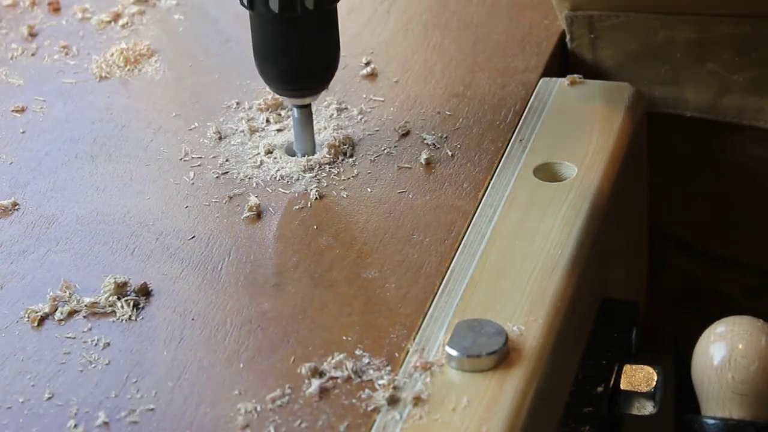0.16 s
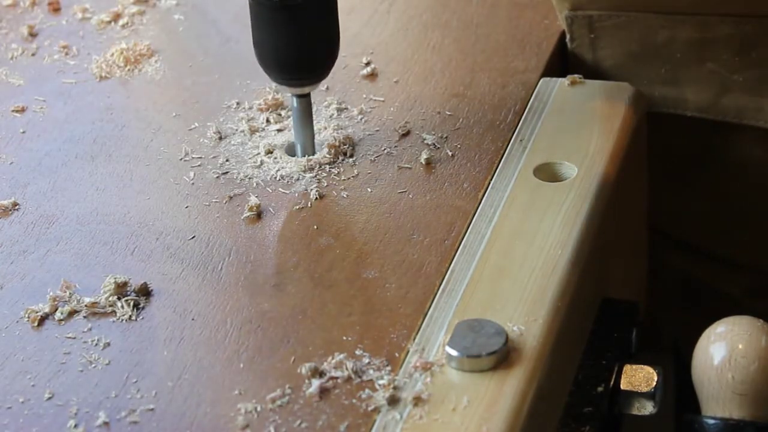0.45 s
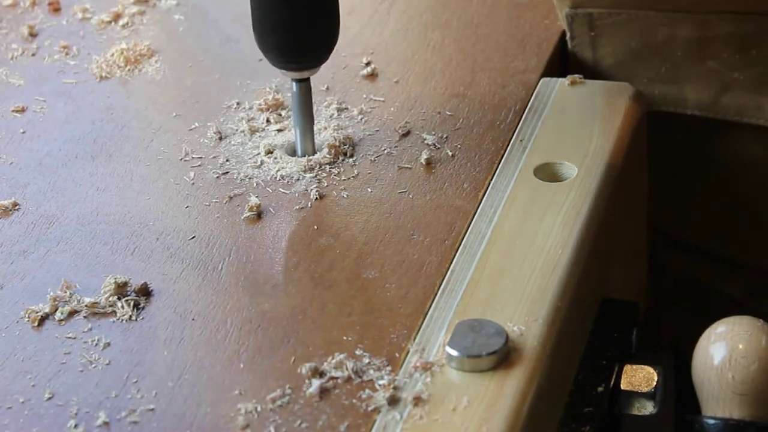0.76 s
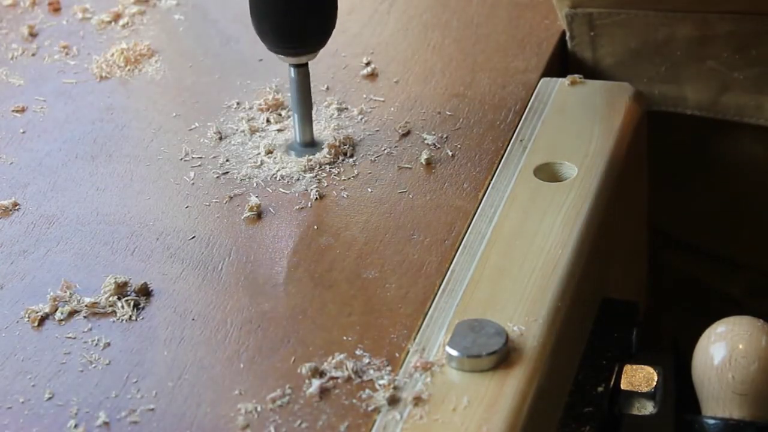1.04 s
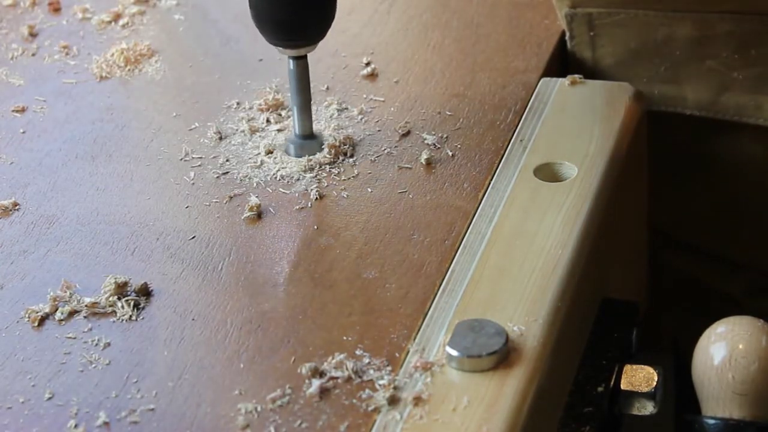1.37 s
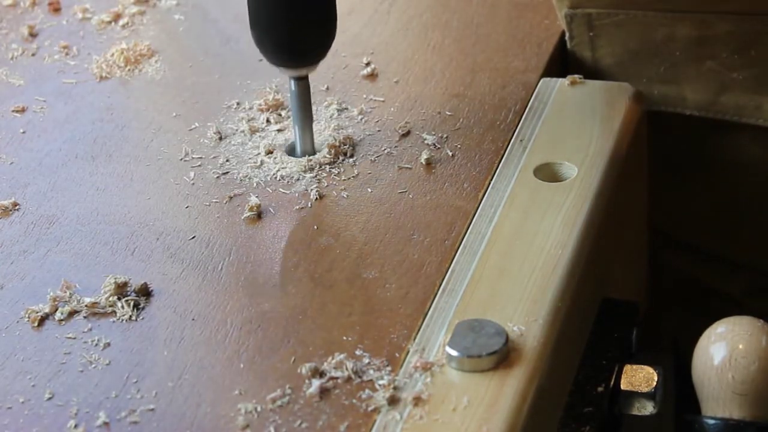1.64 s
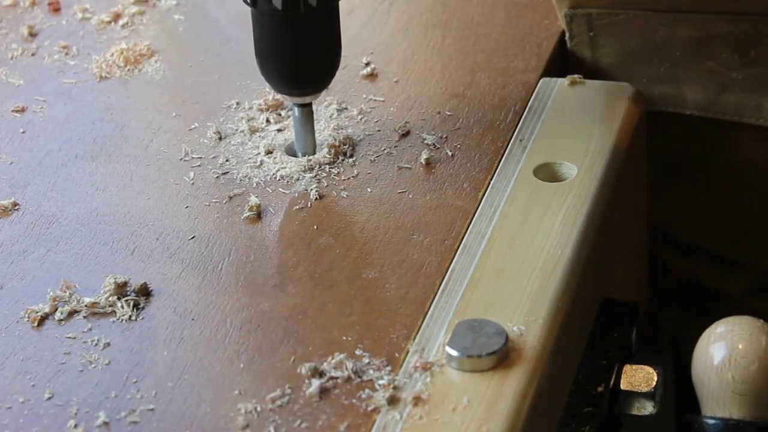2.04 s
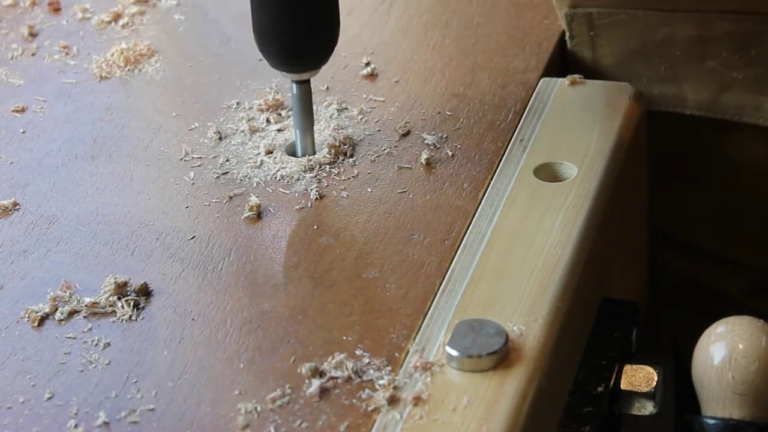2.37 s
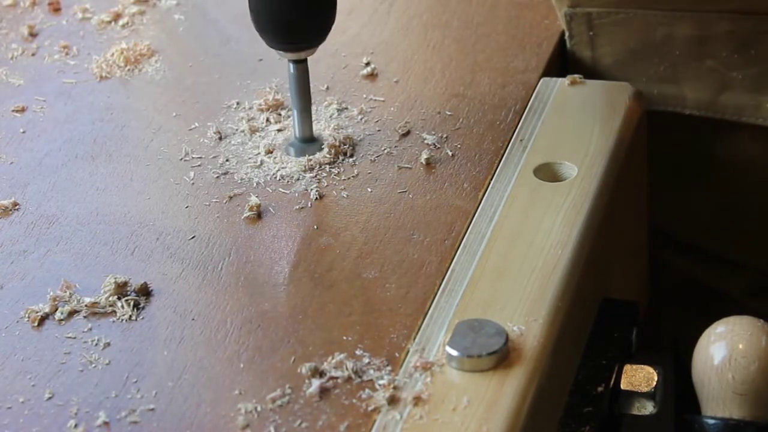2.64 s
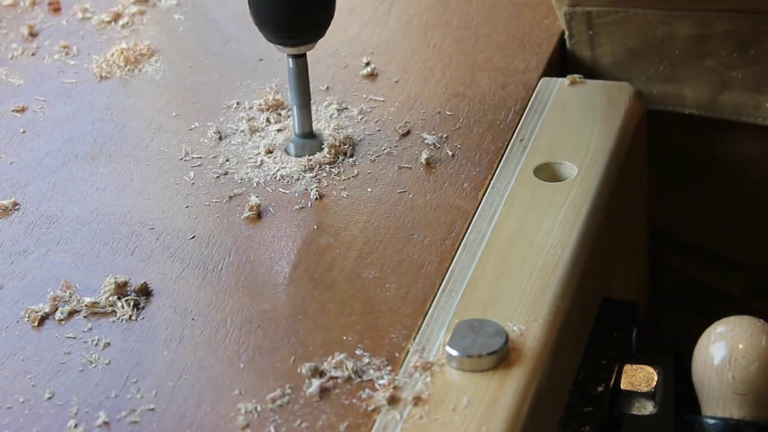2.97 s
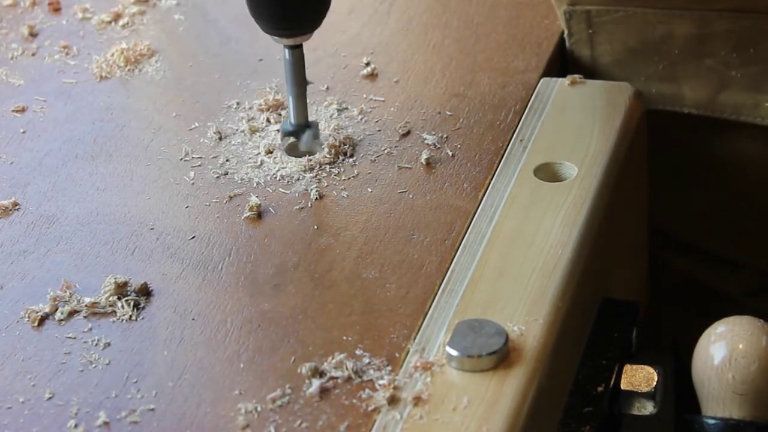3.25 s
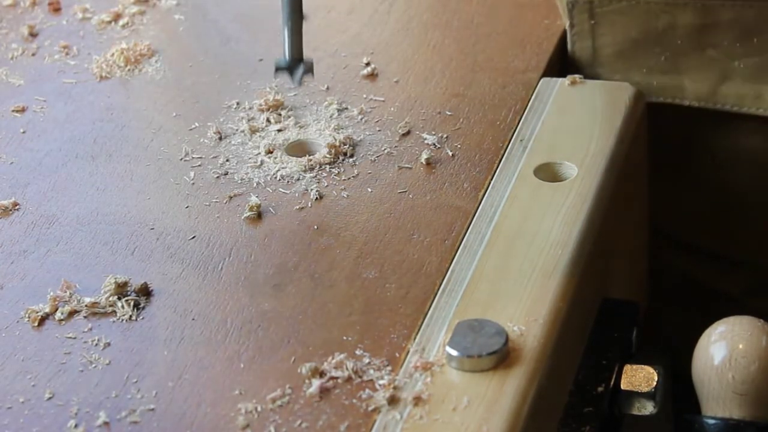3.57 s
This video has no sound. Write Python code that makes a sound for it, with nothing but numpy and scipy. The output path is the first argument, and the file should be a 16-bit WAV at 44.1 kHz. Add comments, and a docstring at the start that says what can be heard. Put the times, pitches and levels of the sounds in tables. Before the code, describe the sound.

A power drill whines and rattles as its bit scrapes wood, then stops with sharp clacks.

```python
"""A power drill turns a large bit in a hole in a wooden workbench, close by in a small workshop.
From the start the gear teeth whine and rattle the housing, the brushes fizz, and the bit scrapes chips and
shakes the bench with rumbles and groans; twice the pitch sags under load and recovers.
Near the end the trigger is eased and the motor slows; the brake then stops the chuck in a quick cluster
of clacks, the chuck and bit ring on, and the quiet workshop air is left."""
import sys
import numpy as np
from scipy import signal
from scipy.fft import rfft, irfft
from scipy.io import wavfile
from scipy.ndimage import uniform_filter1d

SR = 44100
rng = np.random.default_rng(int(sys.argv[2]) if len(sys.argv) > 2 else 0)


def transcribe(signal):
    """Save signal, clipped to [-1, 1], as a 16-bit WAV file at the path in sys.argv[1]."""
    frames = np.atleast_2d(signal).T
    limited = np.clip(frames, -1, 1)
    pcm = np.round(limited * 32767).astype(np.int16)
    wavfile.write(sys.argv[1], SR, pcm)


N = 163170
T = np.arange(N) / SR

# In every spectrum below, density/dB is a relative tone colour per Hz; the level is set apart from it.
# quiet workshop air: [f/Hz, density/dB]
AIR_SPECTRUM = [(15,-43),(30,-18.5),(55,-0.5),(100,-9.5),(230,-1),(480,-2),(750,-11.5),(3000,-14),(15500,-29.5)]
AIR_DB = -90
# workshop reverberation: [f/Hz, t60/s]
ROOM_DECAY = [(100,0.13),(600,0.5),(2000,0.29),(5000,0.24),(14000,0.29)]
ROOM_SEND_DB, TONE_SEND_DB, REFLECTIONS_PER_S = -10, -4, 3000

# bench rumble under the bit: [f/Hz, density/dB], then [t/s, level/dB]
RUMBLE_SPECTRUM = [(25,-28),(48,-32),(64,-14.5),(80,1),(100,-8.5),(138,1.5),(175,-16),(300,-2),(800,-76)]
RUMBLE_LEVEL = [(0,-90),(.17,-97),(.2,-73),(.28,-81),(.4,-91),(.5,-102),(.6,-88),(.7,-85),(.78,-84),(.93,-83),(1.1,-95),(1.6,-89.5),(1.7,-84.5),(1.87,-84),(1.98,-96),(2.06,-80.5),(2.22,-95),(2.37,-77.5),(2.55,-86),(2.72,-95),(2.9,-95),(3.25,-87.5)]
# bench groan under the bit: [f/Hz, density/dB], then [t/s, level/dB]
GROAN_SPECTRUM = [(150,-33),(270,-6.5),(380,0.5),(560,6),(750,-2),(1400,-27)]
GROAN_LEVEL = [(0,-74),(.16,-74),(.21,-64.5),(.36,-75),(.5,-86),(.59,-71),(.78,-70),(1.1,-75),(1.6,-73.5),(1.69,-62.5),(1.79,-75),(1.87,-61.5),(1.95,-96),(2.07,-65.5),(2.2,-80),(2.36,-70),(2.55,-70.5),(2.67,-69),(2.78,-73),(2.9,-67),(3.05,-77),(3.25,-77.5)]
# bit scraping out chips: [f/Hz, density/dB], then [t/s, level/dB]
SCRAPE_SPECTRUM = [(250,-25.5),(450,-11),(800,2),(2000,3),(4500,10),(6500,0),(9000,-9.5),(15500,-20)]
SCRAPE_LEVEL = [(0,-57.5),(.3,-59),(.45,-66),(.7,-57),(1.1,-60),(1.5,-63.5),(1.75,-61),(2.05,-83.5),(2.4,-56),(2.7,-71.5),(3,-63),(3.25,-70.5)]
CHIPS_PER_S, CHIP_SPREAD_DB = 730, 2

# brake blows: [t/s, snap level/dB, body level/dB]
CLACKS = [(3.257,-52,-56),(3.2706,-51,-53),(3.2742,-37.5,-48),(3.2963,-45.5,-44.5),(3.321,-54,-50.5)]
# short ring of the spindle lock: [f/Hz, level/dB, t60/s]
LOCK_RING = [(4450,-5,.012),(5350,0,.006),(6150,-3,.008)]
# broad tick in each snap: [f/Hz, density/dB]
TICK_SPECTRUM = [(30,-1),(100,-3),(300,-3),(1000,-6),(4000,1),(7000,12),(10000,-1),(15500,-21)]
# contact noise in each clack: [f/Hz, density/dB]
BODY_SPECTRUM = [(100,-30.5),(400,-15),(1000,-10.5),(1600,-3),(2300,-1.5),(3200,-9.5),(4400,-12),(6200,-8),(7000,-20),(15500,-46)]
# ring of the loose chuck and bit: [f/Hz, level/dB, t60/s]
CHUCK_RING = [(1870,-73.5,0.24),(2070,-76,0.14),(3990,-63,.19),(4160,-58,0.3),(4420,-62.5,0.18),(4530,-68,.25),(4530,-48.5,0.22),(4974,-63,0.21),(5400,-72,0.27),(6067,-76,.23),(6500,-66,0.28)]
TICK_DB, BODY_DECAY_S, CHATTER_HZ = 5, .0035, 140
STOP_S, RUN_OUT_S = 3.266, .018  # start and time constant of the drill's fade

# fizz of the motor brushes: [f/Hz, density/dB], then [t/s, level/dB]
FIZZ_SPECTRUM = [(4000,-37.5),(9000,-5.5),(11500,-4),(13400,2),(15500,-2.5)]
FIZZ_LEVEL = [(0,-70),(.34,-71),(.76,-66.5),(1.1,-70),(1.41,-70),(1.58,-71),(1.77,-68),(2.05,-69),(2.38,-69),(2.7,-71.5),(3.05,-71),(3.25,-67.5)]
SPARKS_PER_S, SPARK_SPREAD_DB, FIZZ_THROB = 1700, 2.8, 0.18

# gear rattle: [f/Hz, density/dB], then [t/s, level/dB]
RATTLE_SPECTRUM = [(30,-57),(90,-40.5),(170,-33.5),(260,-22),(370,-16),(560,-18.5),(700,-20.5),(830,-11.5),(1040,-7),(1450,-3.5),(1780,-9.5),(2100,-4),(2500,-4.5),(2950,-9.5),(3600,-4),(4220,-5),(5650,-9.5),(6700,-11.5),(8300,-20),(11600,-28),(13300,-29),(15500,-34)]
RATTLE_LEVEL = [(0,-52.5),(.4,-52.5),(.6,-51.5),(.73,-52.5),(.8,-54.5),(1.15,-53),(1.5,-52),(1.8,-51.5),(2.05,-51.5),(2.6,-53),(2.75,-51.5),(3,-53),(3.25,-56)]
# housing and chuck resonances: [f/Hz, width/Hz, level/dB]
HOUSING_MODES = [(567,45,-80.5),(610,23,-78.5),(1051,37,-68),(1148,60,-71.5),(1387.5,17,-71.5),(2074,78,-67.5),(2605,43,-73.5),(3910,97,-66.5),(4344,60,-73.5),(5125,22,-68.5),(5570,4.7,-73),(6310,95,-75),(6500,60,-90),(7700,90,-81),(9190,110,-81),(10260,170,-76.5)]
KNOCKS_PER_S, KNOCK_SPREAD_DB, GRIND_SHARE = 4500, 0, 0.59
TURN_DEPTH, CARRIER_DEPTH = 0.11, 0.05  # throb with the shaft and with the planet carrier
CARRIER_RATIO = 6  # shaft turns per carrier turn

# gear-mesh pitch, following motor speed: [t/s, f/Hz]
MESH_PITCH = [(0, 3765), (0.06, 3800), (0.17, 3885), (0.35, 3880), (0.51, 3970), (0.65, 3800), (0.84, 3427),
              (0.93, 3398), (1.02, 3578), (1.33, 3880), (1.42, 3912), (1.53, 3968), (1.68, 3974),
              (1.79, 3837), (1.9, 3784), (2.02, 3837), (2.14, 3886), (2.25, 3913), (2.42, 3563),
              (2.52, 3452), (2.72, 3773), (2.92, 3898), (2.98, 3848), (3.14, 3265), (3.26, 2888)]
# mesh whine: [t/s, level/dB]
WHINE_LEVEL = [(0,-57),(.3,-60),(.4,-57.5),(.53,-52),(.72,-65),(.92,-57.5),(1.12,-70),(1.25,-60),(1.35,-48),(1.47,-47.5),(1.65,-52.5),(1.9,-56),(2.25,-57.5),(2.34,-57),(2.46,-57.5),(2.65,-65),(2.8,-61),(2.92,-48),(3.03,-64.5),(3.15,-54),(3.26,-78)]
# octave of the mesh whine: [t/s, level/dB]
OCTAVE_LEVEL = [(0,-71),(.3,-68),(.45,-82),(.6,-70),(.8,-70),(1.22,-83),(1.4,-71),(1.55,-81),(1.88,-64.5),(2.15,-75),(2.3,-66.5),(2.5,-69),(2.7,-80),(2.92,-69.5),(3.03,-76.5),(3.15,-84)]
# weaker motor tones: [multiple of the shaft rate, level/dB]
MOTOR_TONES = [(5,-73.5),(10,-76.5),(11,-73.5),(13,-78.5),(20,-77),(22,-74.5),(24,-79),(25,-72.5),(34,-80.5),(35,-81),(36,-87),(40,-90)]
# resonances that lift a motor tone gliding through: [f/Hz, width/Hz, lift/dB]
TONE_LIFTS = [(2100,190,10.5)]
TEETH = 15
JITTER, JITTER_HZ = .0016, 92.5  # share of the pitch, rate
WAVER_DB, WAVER_HZ = 1.64, 45
FRAY_DB, FRAY_HZ = -64, 130
FLICKER_DB, FLICKER_HZ = 3.5, 17

EDGE_HZ = 15720  # cutoff of the final low-pass


def amp(db):
    """Turn decibels into a gain."""
    return 10 ** (np.asarray(db) / 20)


def unit(x):
    """Bring a signal to an RMS of one."""
    return x / np.sqrt(np.mean(x ** 2) + 1e-20)


def curve(points):
    """Draw straight automation lines between timed points."""
    return np.interp(T, *np.transpose(points))


def read(points, hz):
    """Read a spectrum between its points along log frequency."""
    f, value = np.transpose(points)
    return np.interp(np.log(hz + 1), np.log(f + 1), value)


def colour(x, spectrum, size=4096):
    """Causal minimum-phase filter with the given spectrum and unit power gain."""
    log_gain = np.log(amp(read(spectrum, abs(np.fft.fftfreq(size, 1 / SR)))))
    response = np.exp(signal.hilbert(log_gain).conj())
    taps = np.fft.ifft(response).real[:size // 2]
    return signal.oaconvolve(x, taps / np.linalg.norm(taps))[:N]


def noise():
    """White noise for the whole scene."""
    return rng.standard_normal(N)


def wander(hz):
    """Smooth random drift of about unit RMS, rolling off around the given rate."""
    size = 8192
    rates = np.fft.rfftfreq(size, T[-1] / size)
    slow = irfft(rfft(rng.standard_normal(size)) / (1 + (rates / hz) ** 2))
    return np.interp(T, np.linspace(0, T[-1], size), unit(slow))


def fuzz(hz):
    """Narrow complex noise that frays a tone."""
    return (wander(hz) + 1j * wander(hz)) / np.sqrt(2)


def impacts(rate, spread_db):
    """Tiny blows at random times and of random sign; the spread makes their sizes uneven."""
    size = amp(spread_db * np.minimum(rng.exponential(1, N), 4))
    return unit(size * rng.choice([-1, 1], N) * (rng.random(N) < rate / SR))


def resonate(x, hz, width):
    """Ring one damped mode and bring it to unit RMS."""
    pole = np.exp((-np.pi * width + 2j * np.pi * hz) / SR)
    return unit(signal.lfilter([1], [1, -pole], x).real)


def burst(start, decay_s):
    """A puff of contact noise that dies quickly."""
    return noise() * (T >= start) * np.exp(-abs(T - start) / decay_s)


def workshop_air():
    """Steady coloured noise of the quiet workshop."""
    return amp(AIR_DB) * colour(noise(), AIR_SPECTRUM)


def room(x, size=22050):
    """Dense random reflections after a 3 ms gap, each band dying at its own speed."""
    taps = rng.standard_normal(size) * (rng.random(size) < REFLECTIONS_PER_S / SR) * (T[:size] > .003)
    hz, t, bands = signal.stft(taps, SR, nperseg=256)
    decay = amp(-60 * t / read(ROOM_DECAY, hz)[:, None])
    tail = signal.istft(bands * decay, SR, nperseg=256)[1]
    return signal.fftconvolve(x, tail / np.linalg.norm(tail))[:N]


def bench():
    """The bit shakes the bench: low noise makes the rumble, a stream of small blows the groan."""
    rumble = colour(noise(), RUMBLE_SPECTRUM) * amp(curve(RUMBLE_LEVEL))
    groan = colour(impacts(600, 1.5), GROAN_SPECTRUM) * amp(curve(GROAN_LEVEL))
    return rumble + groan


def chips():
    """The bit tears chips from the wood, each one a tiny blow, in an unsteady scrape."""
    level_db = curve(SCRAPE_LEVEL) + 2 * wander(37)
    return colour(impacts(CHIPS_PER_S, CHIP_SPREAD_DB), SCRAPE_SPECTRUM) * amp(level_db)


def brake():
    """The spindle lock snaps shut and rebounds; the hardest blow sets the loose chuck ringing and chattering."""
    blows = sum(amp(db) * (np.arange(N) == round(s * SR)) for s, db, _ in CLACKS)
    lock = np.zeros(N)
    for k, (hz, db, t60) in enumerate(LOCK_RING):
        lock += (-1) ** k * amp(db - 60 * T / t60) * np.sin(2 * np.pi * hz * T)  # alternate polarity
    snaps = signal.fftconvolve(blows, lock)[:N] + amp(TICK_DB) * colour(blows, TICK_SPECTRUM)
    bodies = colour(sum(amp(db) * burst(s, BODY_DECAY_S) for s, _, db in CLACKS), BODY_SPECTRUM)

    hardest_s = max(CLACKS, key=lambda row: row[1])[0]
    age = np.maximum(T - hardest_s, 0)
    ring = np.zeros(N)
    for hz, db, t60 in CHUCK_RING:
        tone = fuzz(CHATTER_HZ) * np.exp(2j * np.pi * hz * age)
        ring += amp(db - 60 * age / t60) * tone.real
    return snaps + bodies + ring * (age > 0)


def brushes(turns):
    """Tiny sparks at the commutator, swelling with each turn of the planet carrier."""
    throb = 1 + FIZZ_THROB * np.cos(2 * np.pi * turns / CARRIER_RATIO)
    level_db = curve(FIZZ_LEVEL) + 2 * wander(14)
    return colour(impacts(SPARKS_PER_S, SPARK_SPREAD_DB), FIZZ_SPECTRUM) * throb * amp(level_db)


def gears(turns):
    """Teeth knock and grind, throbbing with the shaft and the planet carrier, and ring the housing."""
    shaft_throb = TURN_DEPTH * np.cos(2 * np.pi * turns)
    carrier_throb = CARRIER_DEPTH * np.cos(2 * np.pi * turns / CARRIER_RATIO)
    force = (1 + shaft_throb + carrier_throb) * amp(curve(RATTLE_LEVEL) + 0.49 * wander(70))
    knocks = unit(impacts(KNOCKS_PER_S, KNOCK_SPREAD_DB) + GRIND_SHARE * noise())
    ring = sum(amp(db) * resonate(force * noise(), hz, width) for hz, width, db in HOUSING_MODES)
    return colour(force * knocks, RATTLE_SPECTRUM) + ring


def whine(turns, shaft_hz):
    """The gear mesh sings, frayed by backlash, over weaker multiples of the shaft rate."""
    mesh = amp(curve(WHINE_LEVEL) + WAVER_DB * wander(WAVER_HZ)) + amp(FRAY_DB) * fuzz(FRAY_HZ)
    octave = amp(curve(OCTAVE_LEVEL) + WAVER_DB * wander(WAVER_HZ))
    tooth = np.exp(2j * np.pi * TEETH * turns)
    out = (mesh * tooth + octave * tooth ** 2).real  # squaring doubles the pitch
    for k, db in MOTOR_TONES:
        lift_db = sum(lift / (1 + (2 * (k * shaft_hz - hz) / width) ** 2) for hz, width, lift in TONE_LIFTS)
        level = amp(db + lift_db + FLICKER_DB * wander(FLICKER_HZ))
        out += level * np.sin(2 * np.pi * (k * turns + rng.random()))
    return np.sqrt(2) * out  # makes the levels RMS


def scene():
    """Motor speed drives whine, rattle and fizz; the drill fades as the brake bites, all in the centre."""
    mesh_hz = uniform_filter1d(curve(MESH_PITCH), size=1500) * (1 + JITTER * wander(JITTER_HZ))
    shaft_hz = mesh_hz / TEETH
    turns = np.cumsum(shaft_hz) / SR
    running = np.exp(-np.maximum(T - STOP_S, 0) / RUN_OUT_S)
    tones = running * whine(turns, shaft_hz)
    noises = running * (gears(turns) + brushes(turns) + chips() + bench()) + brake()
    reverb = amp(ROOM_SEND_DB) * room(noises + amp(TONE_SEND_DB) * tones)
    mono = tones + noises + reverb + workshop_air()
    return np.array([mono, mono])


def record(dry):
    """A steep linear-phase low-pass takes off the extreme treble."""
    taps = signal.firwin(1023, EDGE_HZ, window=("kaiser", 9), fs=SR)
    return signal.oaconvolve(dry, taps[None], "same")


dry = scene()
out = record(dry)
transcribe(out)
```